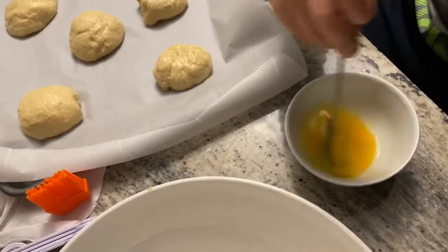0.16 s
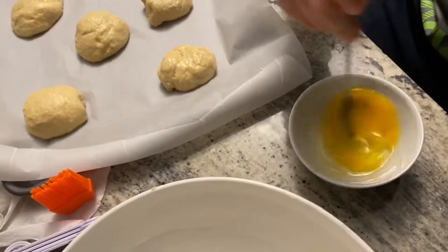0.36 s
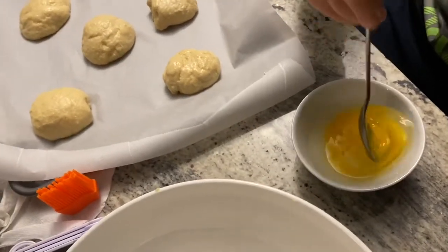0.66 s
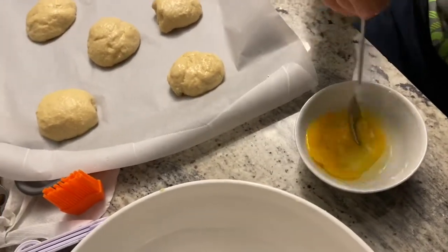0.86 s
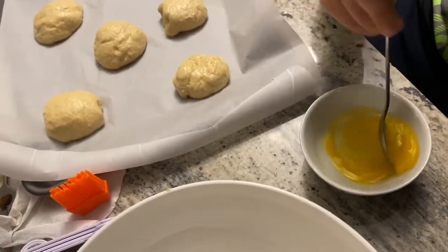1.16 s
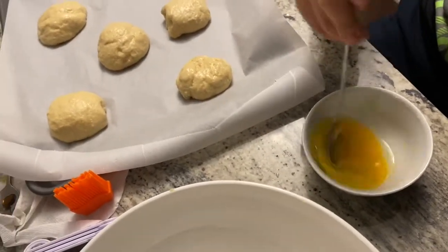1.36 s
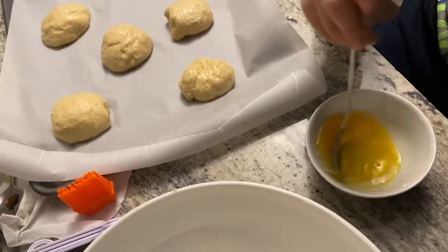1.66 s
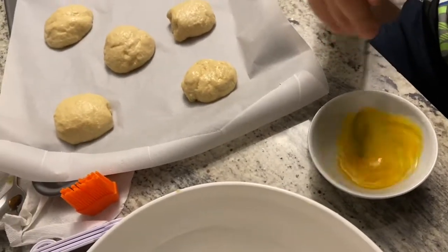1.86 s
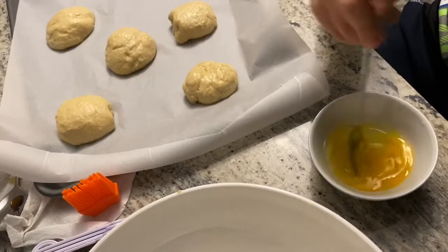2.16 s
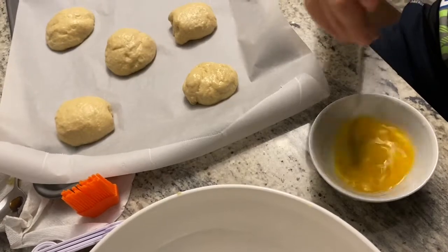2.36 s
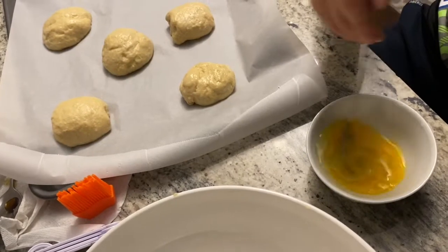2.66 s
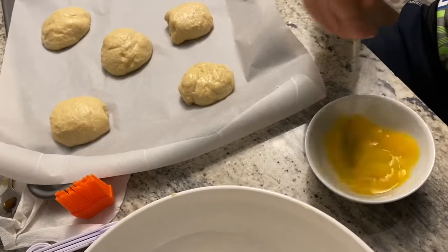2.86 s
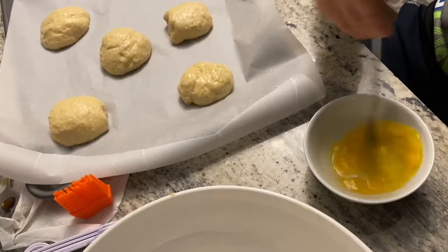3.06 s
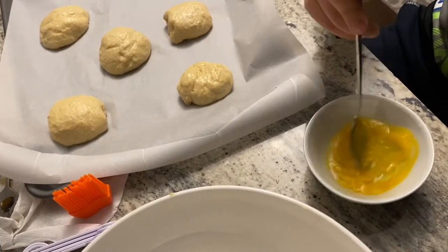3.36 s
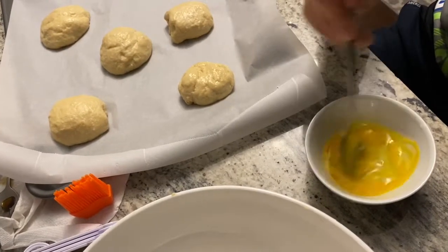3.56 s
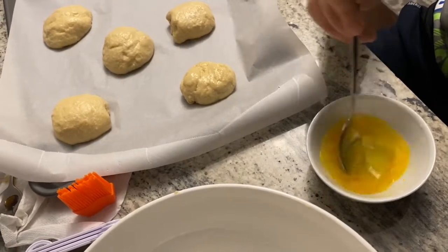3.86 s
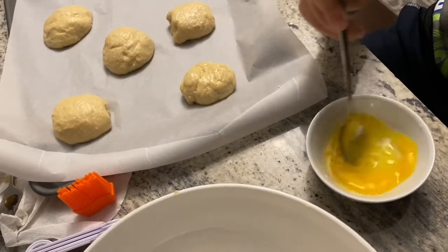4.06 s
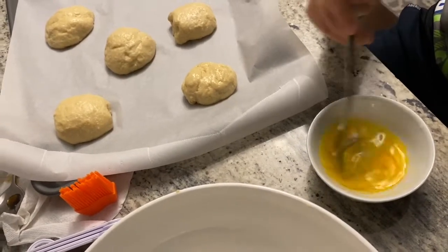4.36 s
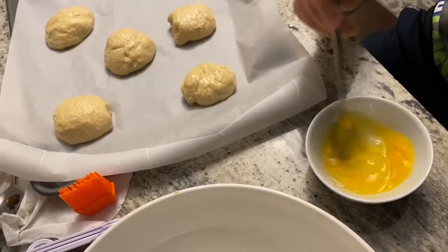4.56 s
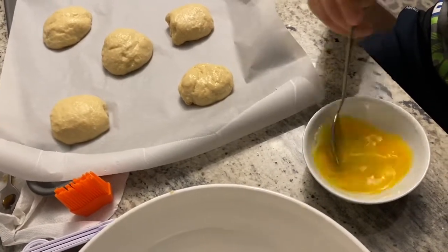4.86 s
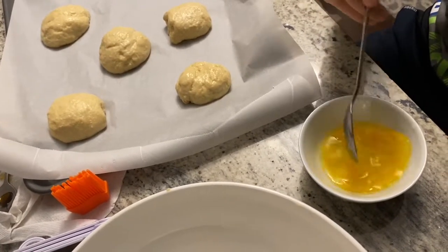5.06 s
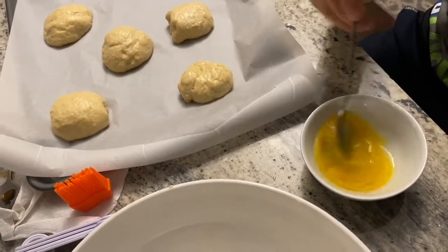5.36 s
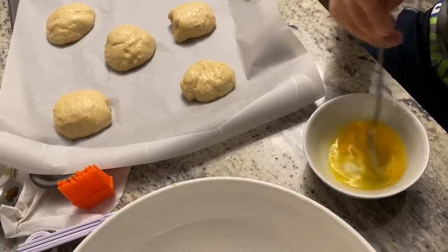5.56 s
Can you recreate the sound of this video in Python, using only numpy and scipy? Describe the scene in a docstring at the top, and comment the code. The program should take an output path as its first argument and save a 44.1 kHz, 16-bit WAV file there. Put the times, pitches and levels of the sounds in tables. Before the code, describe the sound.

A metal spoon beats an egg in a small ceramic bowl, close to the microphone. For the first two seconds it clinks unevenly against the wall, three or four times a second, each hit a sharp crack with a brief ring of steel and ceramic. The strongest of these land at about 0.8 and 1.5 seconds. From around 1.8 seconds short scrapes join in, about four a second, rasping and hissing on the glaze with tiny wet ticks, while the clinks become lighter after 2.2 seconds. The strokes grow quieter from about 4 to 5 seconds. At 5.2 seconds comes the loudest ringing clink, slightly overloading the microphone, followed by a softer tap and scrape at 5.6 seconds. A short, hard kitchen echo surrounds the hits, over faint room air and a low appliance hum.

```python
"""Beating an egg

A metal spoon beats an egg in a small ceramic bowl on a stone counter, close to the microphone.
Each clink on the wall is a crack plus the ringing of spoon and bowl; between clinks the spoon
scrapes round the glaze through the egg. Counter and small kitchen echo it over a faint
appliance hum. The hardest clinks overload the microphone."""
import sys
import numpy as np
from scipy import signal
from scipy.fft import rfft, irfft
from scipy.io import wavfile
from scipy.ndimage import uniform_filter1d

SR = 44100
rng = np.random.default_rng(int(sys.argv[2]) if len(sys.argv) > 2 else 0)


def master(y):
    """Save y as 16-bit WAV."""
    cut = np.clip(np.atleast_2d(y).T, -1, 1)
    pcm = np.round(cut * 32767)  # scale
    wavfile.write(sys.argv[1], SR, pcm.astype(np.int16))


N = 250929
T = np.arange(N) / SR
BRIEF_T = T[:SR // 8]


def undb(db):
    """Decibels to gain."""
    return 10 ** (np.asarray(db) / 20)


def unit(x):
    """Scale to rms 1."""
    return x / np.sqrt(np.mean(x ** 2))


def unit_attack(x):
    """Scale to rms 1 over the first 15 ms."""
    return x / np.sqrt(np.mean(x[:660] ** 2))


def decay(t, t60_s):
    """Exponential fall, 60 dB in t60_s."""
    return np.exp(-np.log(1000) * t / t60_s)


def add(track, start_s, x):
    """Mix a sound into a track."""
    i = max(int(start_s * SR), 0)
    track[i:i + len(x)] += x[:max(N - i, 0)]


def colour(x, spectrum):
    """Filter by (f/Hz, level/dB) points."""
    hz, db = np.transpose(spectrum)
    f = np.maximum(np.fft.rfftfreq(2 * len(x), 1 / SR), 1)
    gain = undb(np.interp(np.log(f), np.log(hz), db))
    return irfft(rfft(x, 2 * len(x)) * gain)[:len(x)]


def walk(rate_hz, size):
    """Smooth random drift, spread near 1."""
    step = max(int(SR / rate_hz), 1)
    stairs = np.repeat(rng.standard_normal(size // step + 1), step)
    return 1.2 * uniform_filter1d(stairs, step)[:size]


# Room air, rumble: f/Hz, relative density/dB
AIR_SPECTRUM = [(100, -38), (170, -7), (335, -7), (437, -6.5), (569, -11.5), (650, -11.5), (846, -17),
                (966, -16), (15500, -44)]
RUMBLE_SPECTRUM = [(1, -2.5), (6, 0), (9, 1), (14, -9.5), (20, -20.5), (35, -30), (55, -38), (80, -45),
                   (150, -42.5), (300, -70), (1000, -120)]
# Appliance hum: f/Hz, level/dB
HUM_TONES = [(84.5, -56.5), (120, -55.5)]


def background(air_db=-51.5, rumble_db=-25):
    """Room air, a wavering appliance hum and a mostly subsonic rumble."""
    air = undb(air_db) * unit(colour(rng.standard_normal(N), AIR_SPECTRUM))
    hum = 0
    for hz, db in HUM_TONES:
        gain = undb(db + 2 * walk(2.5, N))
        hum += gain * unit(np.sin(2 * np.pi * hz * T + 0.3 * walk(8.3, N)))
    rumble = undb(rumble_db) * unit(colour(rng.standard_normal(N), RUMBLE_SPECTRUM))
    return air + hum + rumble


# Room tail: f/Hz, t60/s, relative level/dB
ROOM_BANDS = [(250, 0.24, 6.5), (625, 0.33, 6.5), (1620, 0.38, -6.5), (3630, 0.39, -6.5), (8000, 0.32, -10),
              (12490, 0.22, 0), (15200, 0.026, -4.5)]


def kitchen_echo(x, slap_s=0.0049, slap_db=-9, tail_db=-9, build_s=0.0014):
    """Direct sound, one reflection off the counter and the diffuse tail of a small hard room."""
    t = T[:int(SR * .6)]
    noise = rfft(rng.standard_normal(len(t)))
    f = np.maximum(np.fft.rfftfreq(len(t), 1 / SR), 1)
    hz, t60s, dbs = np.transpose(ROOM_BANDS)
    tail = 0
    for share, t60_s, db in zip(np.eye(len(hz)), t60s, dbs):
        band = irfft(noise * np.interp(np.log(f), np.log(hz), share), len(t))
        tail += undb(db) * band * decay(t, t60_s)
    tail *= 1 - np.exp(-(t / build_s) ** 2)
    response = undb(tail_db) * tail / np.sqrt(np.sum(tail ** 2))
    response[0] += 1
    response[int(slap_s * SR)] += undb(slap_db)
    return signal.fftconvolve(x, response)[:N]


def rub(modes, bend, grip_db, grip_hz, detune, patchy_db):
    """Uneven slips of steel on glaze drive resonances that bend and swell as the contact moves."""
    size = len(bend)
    friction = rng.standard_normal(size) * undb(grip_db * walk(grip_hz, size))
    out = 0
    for hz, width_hz, db, share in modes:
        pitch_hz = hz * (1 + share * (bend + detune * rng.standard_normal()))
        carrier = np.exp(2j * np.pi * np.cumsum(pitch_hz) / SR)
        lowpass = signal.butter(2, width_hz / 2, fs=SR)
        band = np.real(carrier * signal.lfilter(*lowpass, friction / carrier))
        out += undb(db + patchy_db * walk(27.2, size)) * band
    return unit(out)


# Rubbed stem: f/Hz, width/Hz, relative level/dB, share of bend
GROAN_MODES = [(1849, 185, 1.5, 0.78), (1082, 113, -12.5, 0.58), (1319, 80, -14.5, 0.69),
               (2088, 55, -6, 0.0081), (2703, 104, -17.5, 0.9), (3150, 130, -18.5, 0.69),
               (4000, 77, -37, 0.74)]


def stem_groan(bend):
    """Friction drives the stem's resonances."""
    return rub(GROAN_MODES, bend, grip_db=2.2, grip_hz=260, detune=0.0057, patchy_db=1)


# Rubbed scoop edge: f/Hz, width/Hz, relative level/dB, share of bend
HISS_MODES = [(3374, 73, -2, 1), (3826, 180, 3.5, 1.48), (4910, 230, -6, 0.58), (5700, 640, -13.5, 0.8),
              (6640, 110, -4, 0.1), (7210, 250, 0.5, 1.2), (7830, 200, 5.5, 0.28),
              (7900, 2300, -11.5, 0.092), (9610, 480, -12, 0.23), (9620, 340, -10.5, 0.59),
              (11770, 410, -6.5, 0.5), (12600, 420, -15, 0.17), (13500, 550, -20, 0.83),
              (14800, 600, -16, .5)]
# Wet ticks: f/Hz, gain/dB
TICK_SPECTRUM = [(1000, -25), (3000, -6.5), (8000, -8), (13000, 0), (16000, -14)]


def edge_hiss(bend, ticks_per_s=70, tick_gain_db=15):
    """The scoop's edge hisses on the glaze; the film of egg ticks as it tears."""
    size = len(bend)
    hiss = rub(HISS_MODES, bend, grip_db=3.5, grip_hz=460, detune=0.013, patchy_db=3)
    tears = (rng.random(size) < ticks_per_s / SR) * rng.standard_normal(size)
    return hiss + undb(tick_gain_db) * colour(tears, TICK_SPECTRUM)


# Pushes through the egg: t/s, length/s, pressure/dB
PUSHES = [(0.233, 0.056, -36), (1.751, 0.064, -29.5), (1.976, 0.065, -33), (2.219, 0.081, -36),
          (2.432, 0.11, -29.5), (2.68, 0.12, -30.5), (2.937, 0.13, -30.5), (3.177, 0.14, -30),
          (3.417, 0.11, -37.5), (3.645, 0.11, -30.5), (3.895, 0.11, -34.5), (4.128, 0.11, -48),
          (4.372, 0.13, -35.5), (4.643, 0.15, -38.5), (5.566, 0.085, -29.5)]
# Push hiss as the egg lubricates the edge: t/s, gain/dB
LUBRICATION = [(.26, -10), (1.78, -3.5), (2.0, 1.5), (2.25, -13), (2.48, 0), (3.25, -3.5), (4.7, -0.5),
               (5.6, -5)]
# Light swings back on the edge: t/s, length/s, relative pitch glide, hiss level/dB
RETURNS = [(.022, 0.087, 0.042, -37.5), (2.858, 0.063, -0.085, -40), (3.096, 0.072, -0.038, -41),
           (3.519, 0.13, 0.065, -45), (3.775, 0.15, 0.047, -46.5), (4.012, 0.1, -.04, -46.5),
           (4.25, 0.12, -0.11, -46.5)]


def strokes(push_glide=-.09):
    """Yield pushes, then returns; pitch sinks as egg loads the scoop and rises as it drains."""
    for start_s, length_s, pressure_db in PUSHES:
        grip_db = np.interp(start_s + length_s / 2, *np.transpose(LUBRICATION))
        hiss_db = -26.5 + 0.49 * pressure_db + grip_db
        yield start_s, length_s, push_glide, pressure_db + 1.5, hiss_db
    for start_s, length_s, glide, hiss_db in RETURNS:
        yield start_s, length_s, glide, hiss_db + 0.5, hiss_db


# The deeper the spoon runs, the lower it sounds: t/s, relative pitch shift
DEPTH_BEND = [(.06, 0.027), (.26, -0.03), (1.8, 0.00067), (3.24, 0.0024), (3.55, 0.023), (3.95, 0.013),
              (4.06, -.02), (4.18, 0.0018), (4.3, -0.053), (4.44, -0.012), (4.7, -0.037), (5.6, -0.095)]


def scrapes(arch=0.029, wander=0.021):
    """Each stroke swells and fades: the edge hisses first, the stem groans as the spoon presses in."""
    out = np.zeros(N)
    for start_s, length_s, glide, groan_db, hiss_db in strokes():
        size = int(length_s * SR)
        along = np.linspace(0, 1, size)
        depth_bend = np.interp(start_s + length_s / 2, *np.transpose(DEPTH_BEND))
        bend = depth_bend + glide * (along - .5) - arch * (2 * along - 1) ** 2 + wander * walk(28, size)
        swell = np.sin(np.pi * along)
        early_swell = np.abs(np.sin(np.pi * along ** 0.74)) ** 1.22
        add(out, start_s, undb(groan_db) * swell * stem_groan(bend))
        add(out, start_s, undb(hiss_db) * early_swell * edge_hiss(bend))
    return out


def ring(modes, t, stretch=1, skid_s=0, scatter_db=2, slur=0):
    """Decaying modes, weighted anew at each contact; a skidding edge sustains and slurs them."""
    out = 0
    for hz, db, t60_s in modes:
        gain = undb(db + scatter_db * rng.standard_normal())
        fade = decay(np.maximum(t - skid_s, 0), t60_s)
        pitch_hz = hz * stretch * (1 + slur * walk(400, len(t)))
        out += gain * fade * np.sin(2 * np.pi * np.cumsum(pitch_hz) / SR)
    return unit_attack(out)


# Bending modes of the wet spoon, main mode first: nominal f/Hz, relative level/dB, t60/s
STEM_MODES = [(1827, 11, 0.061), (1624, -6, 0.069), (1470, -9, 0.037), (1160, -20.5, .04)]
SCOOP_MODES = [(7833, 3, 0.033), (3834, -19, 0.05), (4830, -12, 0.035), (6796, -8, 0.027),
               (6850, -18.5, 0.044), (6880, -16, .02), (8660, -15.5, 0.011), (9430, -15.5, 0.028),
               (9756, -27.5, 0.07), (12050, -24.5, .025), (12570, -20, 0.027), (14580, -39, .02)]


def spoon_ring(force_db, stem_hz, scoop_db, scoop_hz=8014, skid_doubling_db=13.5):
    """Stem and scoop ring, retuned by grip and depth; a harder-struck scoop skids longer."""
    stem_stretch = stem_hz / STEM_MODES[0][0]
    scoop_stretch = scoop_hz / SCOOP_MODES[0][0] * stem_stretch ** .5
    skid_s = .013 * 2 ** (scoop_db / skid_doubling_db)
    stem = ring(STEM_MODES, BRIEF_T, stem_stretch, skid_s / 2, slur=0.024)
    scoop = ring(SCOOP_MODES, BRIEF_T, scoop_stretch, skid_s, scatter_db=0.5, slur=.014)
    return undb(-7.5 + 0.71 * force_db) * stem + undb(scoop_db) * scoop


# Mid-stroke catches: t/s, level/dB
CATCHES = [(3.2179, -26.5), (3.7627, -31.5)]


def catches(stem_hz=1740):
    """The spoon sticks on the glaze and slips free; only its stem rings."""
    out = np.zeros(N)
    for start_s, db in CATCHES:
        stem = ring(STEM_MODES, BRIEF_T, stem_hz / STEM_MODES[0][0], skid_s=0.0034, slur=0.032)
        add(out, start_s, undb(db) * stem)
    return out


# Bowl modes, struck on the wall and near the rim: f/Hz, relative level/dB, t60/s
WALL_MODES = [(2042, 0, .24), (2020, -11, .16), (2628, -14, .2), (3677, -17, .15), (1330, -22, .18)]
RIM_MODES = [(5034, 0, .33), (5024, -5, .2), (5065, 1, .05), (6640, -19, .19), (7172, -11, .19),
             (8920, -12, .23), (9400, -19, .17), (9860, -20, .17), (11520, -21, .17)]


def bowl_ring(force_db, height, rise_s=0.00053):
    """The wall rings most when struck halfway up, clear of the egg; the rim when struck at the top."""
    t = T[:SR // 2]
    wall_db = -10.5 + 1.034 * force_db + 8.5 * np.sin(np.pi * height)
    rim_db = -19 + force_db + 35.5 * height
    tilt_db_per_octave = rim_db + 10  # harder blows are shorter, so brighter
    tilted = [(hz, db + tilt_db_per_octave * np.log2(hz / RIM_MODES[0][0]), t60_s)
              for hz, db, t60_s in RIM_MODES]
    wall = undb(wall_db) * ring(WALL_MODES, t, scatter_db=1.5, slur=.005)
    rim = undb(rim_db) * ring(tilted, t, scatter_db=1.5, slur=.002)
    return (1 - np.exp(-t / rise_s)) * (wall + rim)


# Dull crack of a blow: f/Hz, relative density/dB
CRACK_SPECTRUM = [(80, -52), (170, -40), (260, -14), (420, -7), (800, -13), (1400, 1.5), (2700, -3.5),
                  (3800, -8), (5800, -17), (9500, -16), (11000, -25.5), (16000, -27.5)]


def crack(height, touch_s=0.00081, rattle_t60_s=0.056, centre_hz=3000, rim_db_per_octave=5.5):
    """A sharp first touch and a dying rattle; towards the rim the band narrows round centre_hz."""
    envelope = undb(6) * np.exp(-BRIEF_T / touch_s) + decay(BRIEF_T, rattle_t60_s)
    spectrum = [(hz, db - rim_db_per_octave * height * abs(np.log2(hz / centre_hz)))
                for hz, db in CRACK_SPECTRUM]
    return unit_attack(colour(rng.standard_normal(len(BRIEF_T)) * envelope, spectrum))


# Blows: t/s, force/dB, stem f/Hz, scoop level/dB, height on the wall (0-1)
CLINKS = [ (0.2276, -26, 1704, -36.5, 0), (0.5416, -21.5, 1778, -20, 0), (0.802, -7.5, 1796, 1.5, 0.09),
          (1.052, -33, 1567, -28.5, 0.81), (1.142, -15.5, 1730, -29.5, 0.4), (1.291, -28, 1768, -13.5, .03),
          (1.4863, -11.5, 1718, -11.5, 0.26), (1.7432, -25.5, 1746, -26.5, 0.05),
          (1.963, -33.5, 1787, -29.5, 0), (2.208, -18.5, 1645, -18, 0), (2.42, -37.5, 1780, -29.5, 0.1),
          (2.659, -37.5, 1760, -33.5, 0.25), (2.8589, -35, 1783, -30, 0.08), (3.097, -40.5, 1810, -42, 0),
          (3.41, -25, 1850, -27.5, 0.01), (3.612, -71, 1790, -47, 0), (4.392, -34, 1787, -39.5, 0),
          (4.58, -56, 1770, -58, 0.25), (4.906, -39, 1714, -46, 0.1), (5.2352, -5, 1751, -16.5, .47),
          (5.5636, -25.5, 1624, -57, 0)]


def clinks():
    """Spoon hits bowl: a crack, a short ring of steel and a longer ring of ceramic."""
    out = np.zeros(N)
    for start_s, force_db, stem_hz, scoop_db, height in CLINKS:
        add(out, start_s, undb(force_db) * crack(height))
        add(out, start_s, spoon_ring(force_db, stem_hz, scoop_db))
        add(out, start_s, bowl_ring(force_db, height))
    return out


def scene():
    """Spoon and bowl in the kitchen, mono."""
    beating = clinks() + catches() + scrapes()
    return (kitchen_echo(beating) + background())[None]


def record(dry):
    """Clip at full scale, then cut the top."""
    top_hz = 15900
    lowpass = signal.ellip(8, .2, 70, top_hz, fs=SR, output="sos")
    return signal.sosfilt(lowpass, np.clip(dry, -1, 1))


dry = scene()
out = record(dry)
master(out)
```